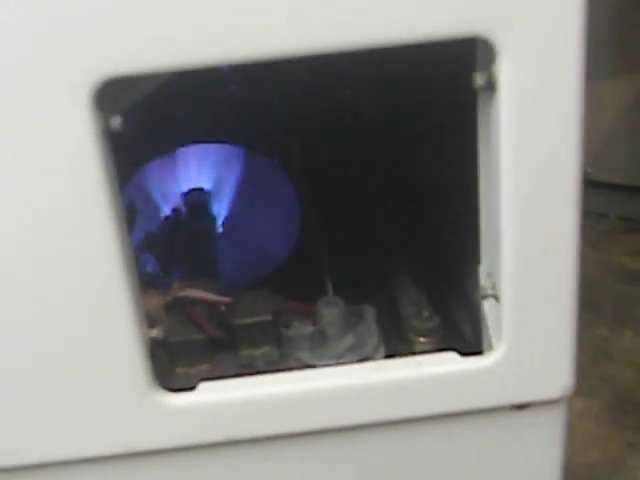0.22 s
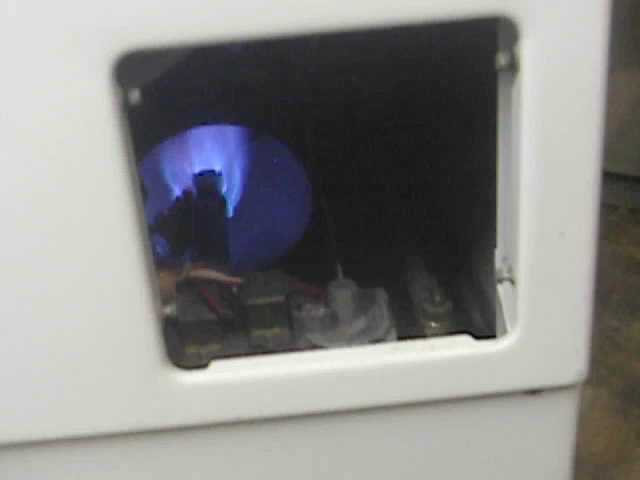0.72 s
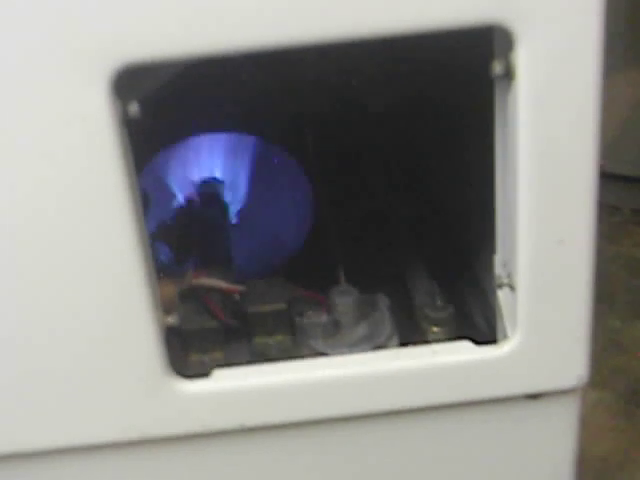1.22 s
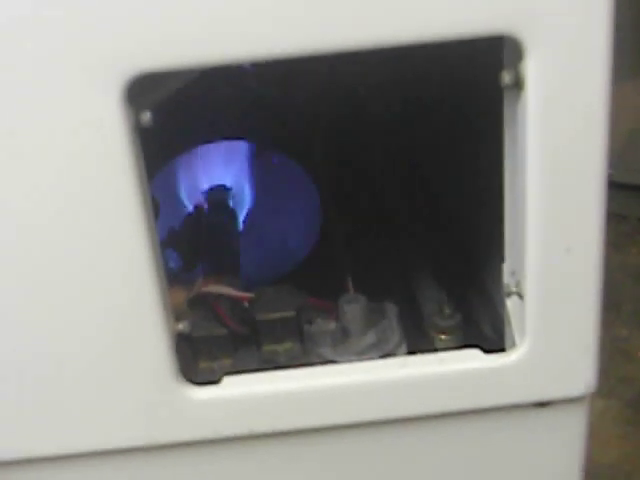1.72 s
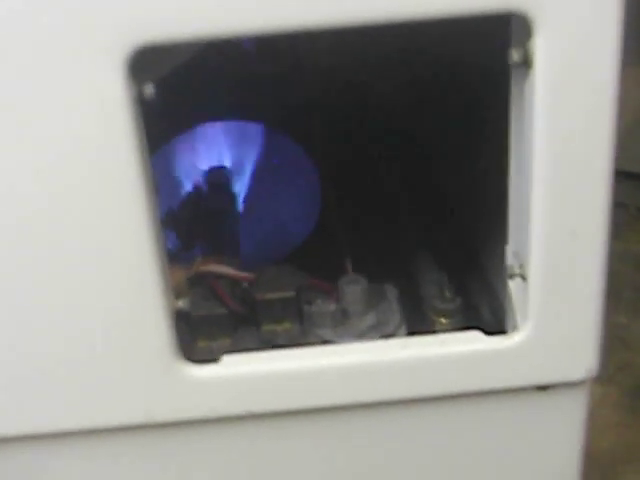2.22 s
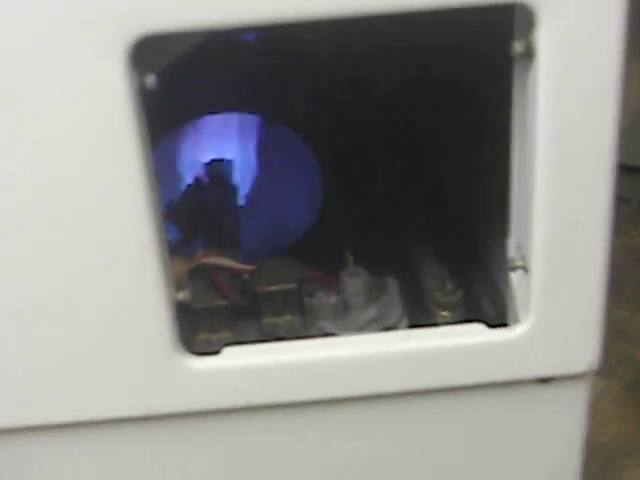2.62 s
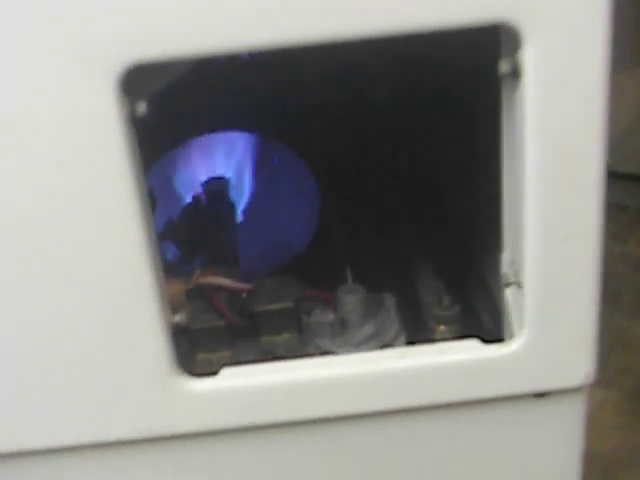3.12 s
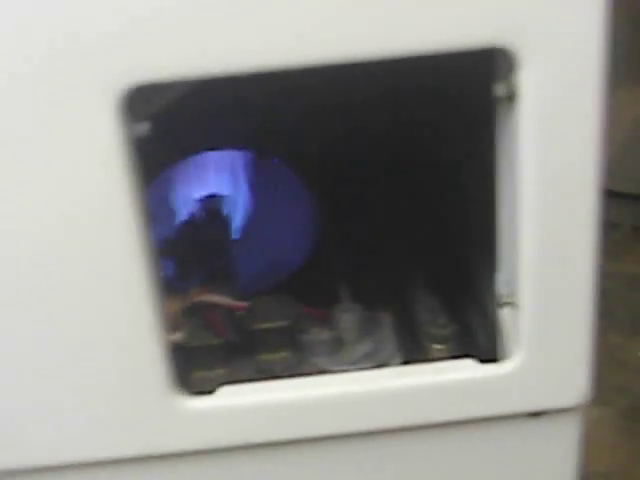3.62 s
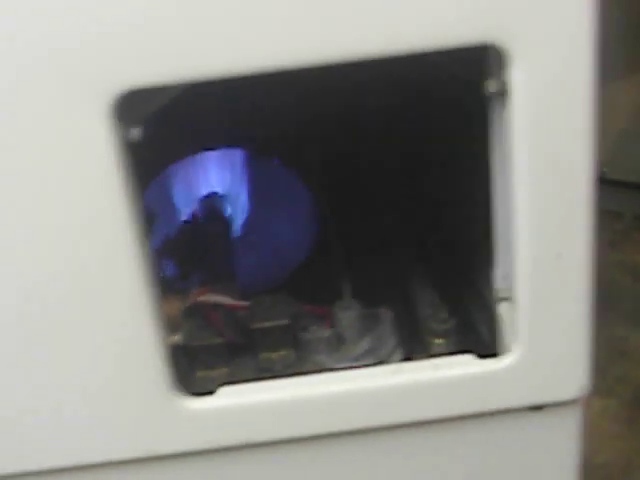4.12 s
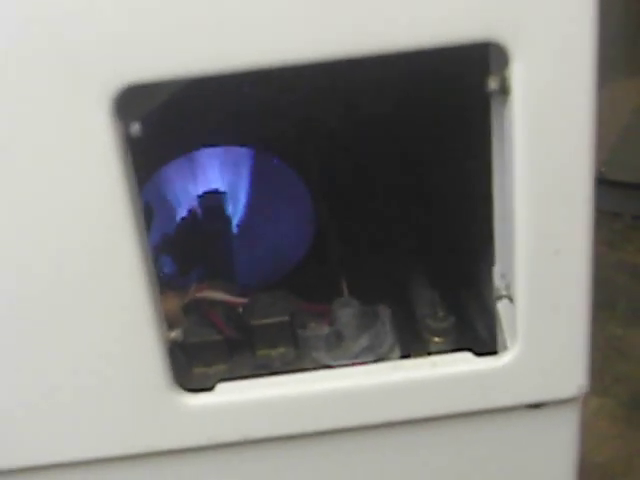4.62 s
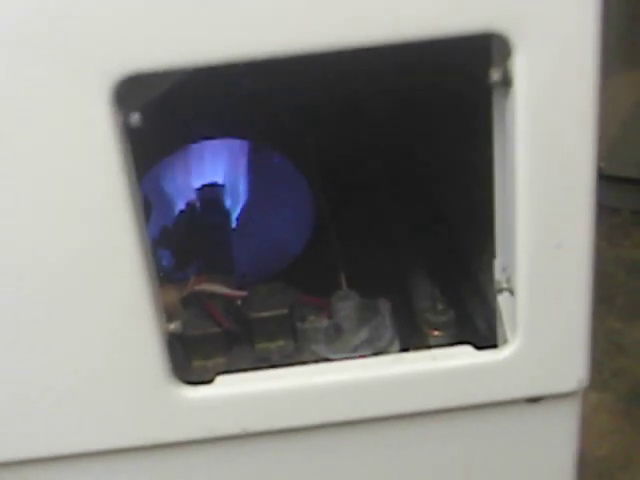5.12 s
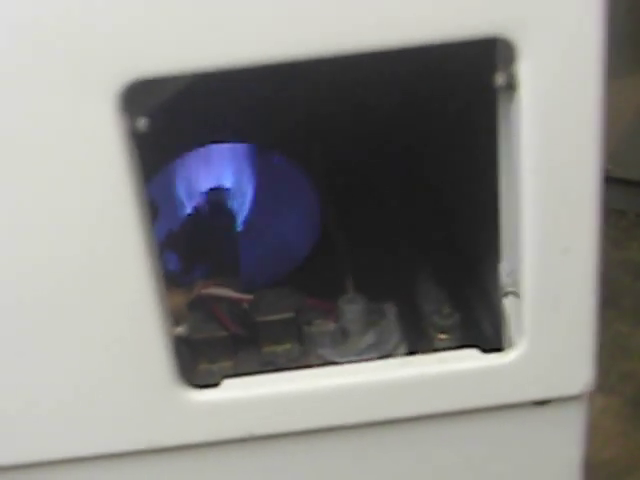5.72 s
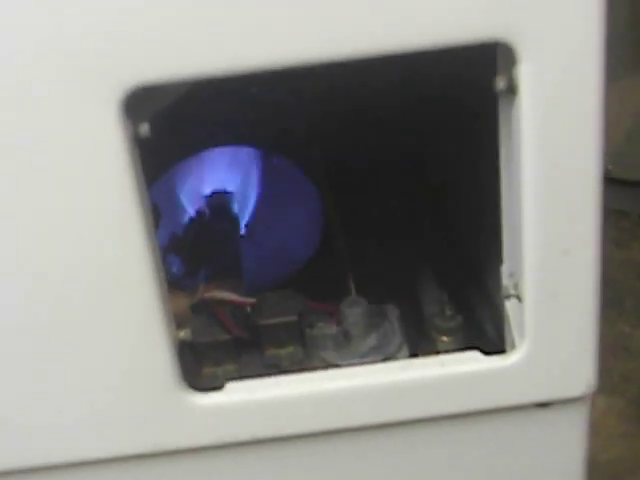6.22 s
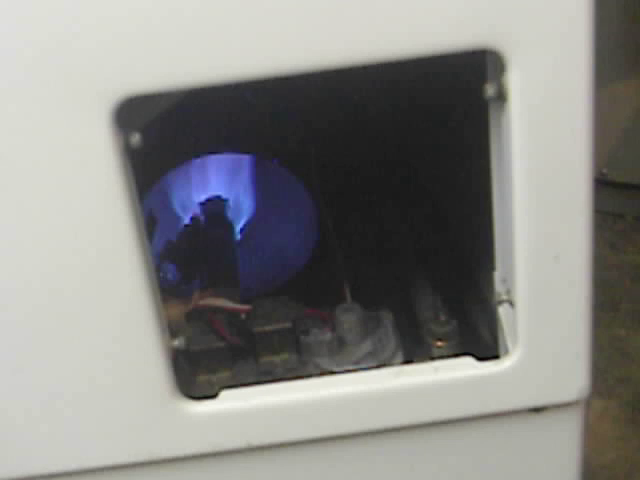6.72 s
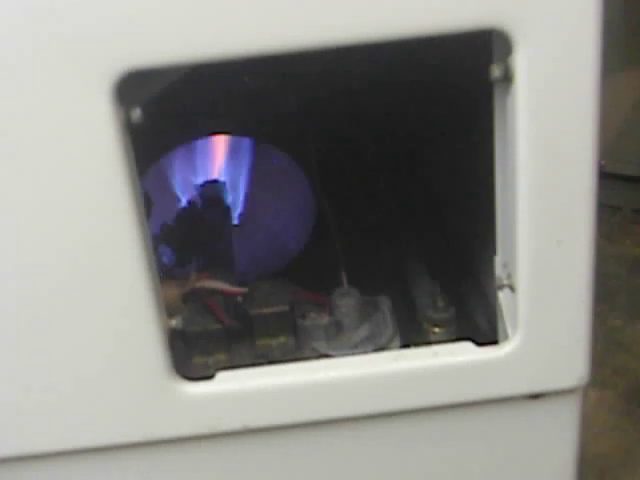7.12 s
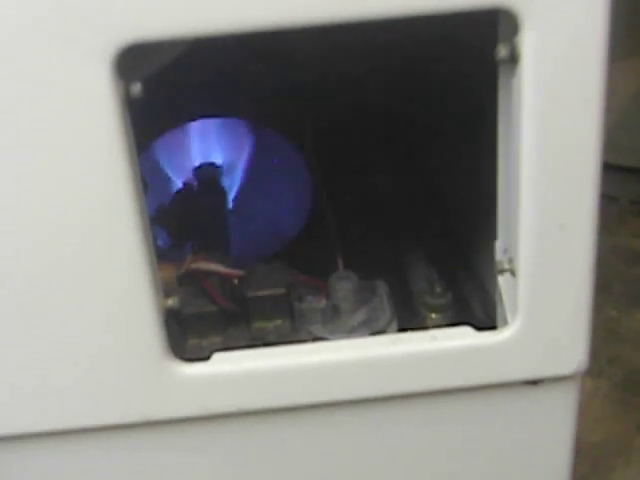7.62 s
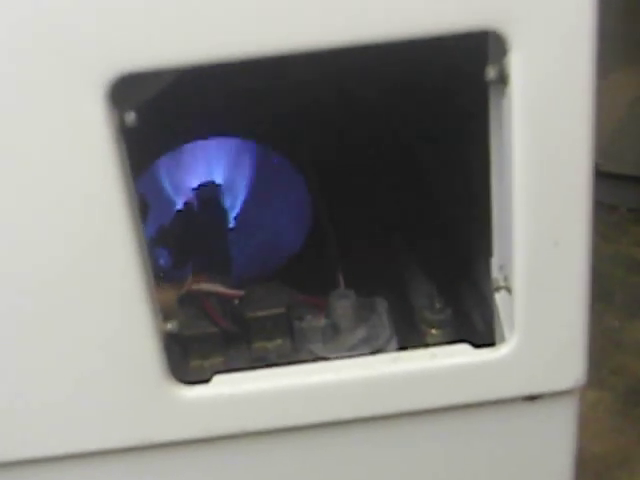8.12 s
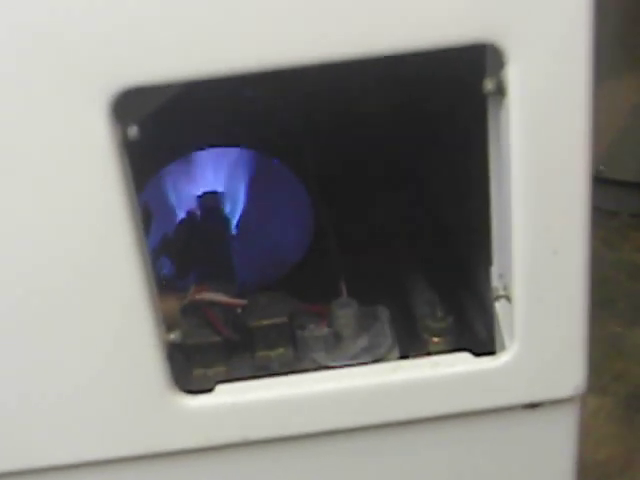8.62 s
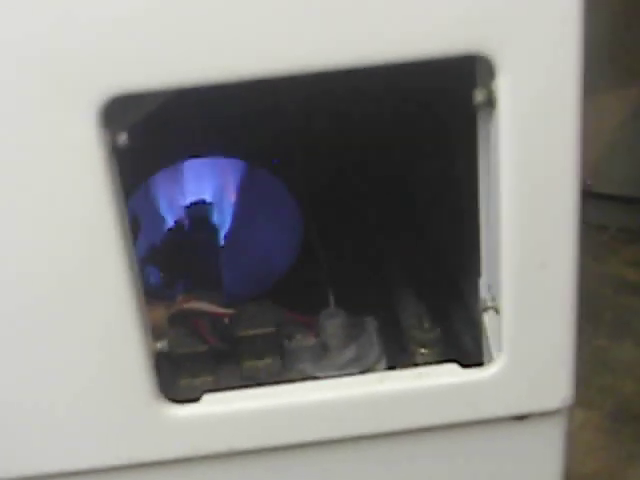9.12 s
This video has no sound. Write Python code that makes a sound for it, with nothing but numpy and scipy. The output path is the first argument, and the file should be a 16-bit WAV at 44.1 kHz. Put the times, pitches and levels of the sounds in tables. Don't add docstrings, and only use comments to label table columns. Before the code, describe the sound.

Boxy burner roar and low motor hum from a running dryer, dull narrow-band sound, small metallic clicks tapping inside the turning drum.

```python
import sys
import numpy as np
from scipy import signal
from scipy.fft import rfft, irfft, next_fast_len
from scipy.io import wavfile
from scipy.ndimage import uniform_filter1d

SR = 44100
rng = np.random.default_rng(int(sys.argv[2]) if len(sys.argv) > 2 else 0)


def natural_amplitude(level_db):
    exponent = np.asarray(level_db, float) / 20
    return 10 ** exponent


def to_wav(sig):
    pcm = np.clip(np.atleast_2d(sig), -1, 1) * 32767
    pcm = np.round(pcm).astype(np.int16)
    wavfile.write(sys.argv[1], SR, pcm.T)


N = 411894
HUM_HZ, SHAFT_HZ, DRUM_HZ, WHINE_HZ = 120.02, 29.42, .85, 615.385
LEFT_HZ, RIGHT_HZ = 7.076, 7.1

# (frequency [Hz], density [dB per Hz])
ROAR_SPECTRUM = [(20, -48.5), (45, -30.5), (70, -19.5), (105, -9), (150, -18), (215, -11), (320, -18.5),
                 (410, -24), (600, -22.5), (760, -26.5), (1500, -29.5), (2400, -29.5), (3300, -28.5),
                 (4200, -34)]
# (frequency [Hz], width [Hz], gain [dB])
CABINET_MODES = [(163, 15, -6.5), (180.7, 13, 9.5), (199, 4.2, -7.5), (252, 16, -1.5), (301.7, 31, 4),
                 (420, 9.1, -4.5), (429.4, 13, 6), (576, 59, 8), (656, 24, 4.5), (822, 14, -0.5),
                 (840.6, 39, 4.5), (940, 100, 2.5), (1010, 50, 0), (1122, 29, 4), (1198, 60, 6),
                 (1294, 8.5, 11), (1307, 30, -4), (1383, 89, 3.5), (1550, 51, -5), (1980, 31, -2.5),
                 (2733, 310, -4), (3360, 37, 5)]
# (time [s], level [dB])
DRAUGHT_LEVEL = [(0, -1), (1, 0.4), (2.4, 0.3), (3, .5), (4, 0), (5, 0.75), (6.3, 0), (8, 1.5), (9.34, .3)]
DRAUGHT_SHARES = [1.3, .3, 0.77]
HUM_LEVELS = [-22, -27, -44]
# (hum multiple [count], shaft multiple [count]), then (rms level [dB])
SWING_MULTIPLES = [(1, -1), (1, 1), (2, -1), (2, 2)]
SWING_LEVELS = [-45, -31, -28, -39]
# (shaft multiple [ratio]), then (rms level [dB])
SHAFT_MULTIPLES = [1, 2, 3, 20, 23.95, 39.906, 47.9, 79.81]
SHAFT_LEVELS = [-51, -51, -53, -47.5, -52.5, -56, -64.5, -52.5]
WHINE_LEVELS = [-60, -52, -47, -58, -57, -50]
# (multiple of the turn [count]), then (rms level [dB])
LEFT_MULTIPLES = [6, 7, 9, 12, 13, 14, 15, 16, 18, 19, 20, 21, 22, 23, 25, 38, 40, 42, 48, 52, 53, 54, 71,
                  72]
LEFT_LEVELS = [-49.5, -57.5, -54.5, -47, -44, -40, -32, -31, -52, -47, -32.5, -36.5, -31.5, -39.5, -39, -48,
               -41.5, -43.5, -51, -58, -52.5, -50.5, -49.5, -44.5]
RIGHT_MULTIPLES = [8, 10, 11, 27, 30, 31, 32, 35]
RIGHT_LEVELS = [-60, -49.5, -41, -42, -32, -38, -45, -47.5]
# (time [s], peak [dB], centre [Hz], ring t60 [s])
BUTTON_KNOCKS = [(.349, -16, 3286, .035), (1.339, -26.5, 3360, 0.093), (1.823, -15.5, 2200, 0.042),
                 (2.897, -12, 2400, .12), (2.975, -12, 1900, 0.047), (3.087, -22.5, 3290, 0.044),
                 (3.227, -18, 2990, 0.039), (3.777, -22, 2400, 0.04), (4.376, -21.5, 3550, 0.05),
                 (4.879, -15, 2630, .04), (4.942, -18.5, 3280, .04), (5.539, -19.5, 1743, 0.14),
                 (6.842, -14, 3510, 0.05), (7.15, -17, 3350, 0.1), (7.228, -14.5, 3280, 0.13),
                 (7.683, -24, 3305, 0.034), (7.74, -17.5, 3280, .055), (8.021, -19.5, 3230, .2),
                 (8.299, -18, 3310, 0.032), (8.343, -13, 3345, .45), (9.132, -16.5, 3610, .05)]
# (time [s], peak [dB], drag [s], brightest [Hz], spread [octaves])
ZIP_CLATTERS = [(1.8224, -13, 0.023, 2800, 0.81), (2.904, -7.5, .018, 2600, 1.1),
                (2.931, -13.5, .016, 2200, 0.8), (2.954, -11, .024, 1500, 1.1),
                (6.747, -13.5, .005, 3000, .35), (7.366, -14, 0.025, 1700, 1.3),
                (8.3185, -2.5, .008, 2900, .45)]
# (frequency [Hz], width [Hz], gain [dB], t60 [s])
WALL_MODES = [(820, 300, -0.5, .08), (1180, 310, -2, .09), (1700, 180, -0.5, 0.081),
              (2200, 340, -0.5, 0.097), (2600, 280, -5, .06), (2910, 260, -2, .06), (3600, 290, -1.5, .08),
              (3960, 290, -3.5, .06)]
# (time [s], peak [dB], frequency [Hz], t60 [s], rise [s])
PANEL_PINGS = [(1.809, -18, 1190, .08, .003), (1.8235, -16, 3480, .07, .0015),
               (1.829, -17, 2950, .04, .002), (1.8365, -17, 2340, .06, .003), (1.837, -19, 3400, .09, .002),
               (2.914, -15, 3950, .03, .002), (2.9225, -13, 1250, .035, .002),
               (2.9225, -14, 1900, .03, .002), (2.931, -15, 2200, .05, .002),
               (2.9555, -15, 1230, .12, .002), (6.7478, -7, 3450, .018, .0008),
               (7.396, -18, 1180, .08, .003), (8.3262, -2, 3390, .022, .0025),
               (8.3365, -10, 3450, .03, .002)]
# (frequency [Hz], gain [dB])
BAND_EDGE = [(3980, 0), (4150, -8), (4300, -19), (4500, -36.5), (4580, -43.5), (4640, -71), (5000, -110)]
# (time [s], cut depth [dB])
RUMBLE_CRESTS = [(2.166, -49), (2.9205, -53), (2.179, -37), (2.9362, -47), (2.942, -42), (7.070, -41),
                 (7.0753, -51.5), (7.948, -54.5), (8.322, -55)]
KNOCK_CRESTS = [(2.9106, -24), (2.9359, -39), (4.3539, -40.5), (5.0398, -62), (5.481, -52), (5.9224, -46),
                (7.522, -38.5), (7.764, -55.5), (8.294, -31), (8.3285, -17.5), (8.3294, -32), (9.147, -61),
                (9.3385, -34)]


def walk(rate):
    hold = int(SR / rate)
    steps = np.repeat(rng.standard_normal(N // hold + 1), hold)
    return 1.15 * uniform_filter1d(uniform_filter1d(steps, hold), hold)[:N]


def tones(phase, multiples, levels_db, locked=False):
    start = rng.random(len(multiples)) * (not locked)
    out = 0
    for k, db, p in zip(multiples, levels_db, start):
        out = out + np.sqrt(2) * natural_amplitude(db) * np.cos(2 * np.pi * (k * phase + p))
    return out


def bandpass(x, low, high):
    return signal.sosfilt(signal.butter(2, [low, high], "band", fs=SR, output="sos"), x)


def burst(hz, width, t60, rise):
    t = np.arange(int(.4 * SR)) / SR
    low, high = np.clip([hz - width / 2, hz + width / 2], 50, SR / 3)
    strikes = natural_amplitude(2.5 * np.repeat(rng.standard_normal(len(t) // 90), 90))
    ring = bandpass(strikes * rng.standard_normal(len(t)), low, high)
    ring = ring * np.minimum(t / rise, 1) * natural_amplitude(-60 * t / t60)
    return ring / np.abs(ring).max()


def add(out, s, sound):
    i = int(s * SR)
    out[i:i + len(sound)] += sound[:N - i]


def whine(t):
    return tones(WHINE_HZ * t, np.arange(1, 7), WHINE_LEVELS)


def seam():
    out = np.zeros(N)
    for s in np.arange(.27, N / SR, 1 / DRUM_HZ):
        add(out, s, natural_amplitude(-19) * burst(1190, 180, .4, 0.1))
    return out


def buttons():
    out = np.zeros(N)
    for s, db, hz, t60 in BUTTON_KNOCKS:
        add(out, s, natural_amplitude(db) * burst(hz, width=230 + 0.23 * hz, t60=t60, rise=.0022))
    return out


def clatter(drag, bright_hz, spread):
    t = np.arange(int(.3 * SR)) / SR
    tooth = t * 160
    uneven_db = 3 * rng.standard_normal(200)[tooth.astype(int)]
    fade_db = 3.5 * (tooth % 1)
    teeth = natural_amplitude(uneven_db - fade_db) * rng.standard_normal(len(t))
    out, held = 0, int(drag * SR)
    for hz, width, db, t60 in WALL_MODES:
        ring = bandpass(teeth, hz - width / 2, hz + width / 2)
        off_db = -6 * (np.log2(hz / bright_hz) / spread) ** 2
        decay_db = -60 * np.maximum(t - drag, 0) / t60
        out = out + ring / ring[:held].std() * natural_amplitude(db + off_db + decay_db)
    out = out * np.minimum(t / .0012, 1)
    return natural_amplitude(-8) * out / out[:held].std()


def zips():
    out = np.zeros(N)
    for s, db, drag, bright_hz, spread in ZIP_CLATTERS:
        add(out, s, natural_amplitude(db) * clatter(drag, bright_hz, spread))
    return out


def pings():
    out = np.zeros(N)
    t = np.arange(SR // 10) / SR
    for s, db, hz, t60, rise in PANEL_PINGS:
        decay = natural_amplitude(db - 60 * np.maximum(t - rise, 0) / t60)
        add(out, s, decay * np.minimum(t / rise, 1) * np.sin(2 * np.pi * hz * t))
    return out


def rollers(t):
    turn = 2 * np.pi * DRUM_HZ * t
    load_db = 1.4 * np.cos(turn + .6) + 0.51 * np.cos(2 * turn + 0.5) + 0.81 * walk(2.8)
    slip = .0012 * np.sin(turn + 1.1) + .0006 * walk(2)
    left = tones(LEFT_HZ * (t + slip), LEFT_MULTIPLES, LEFT_LEVELS)
    right = tones(RIGHT_HZ * (t - slip), RIGHT_MULTIPLES, RIGHT_LEVELS)
    return natural_amplitude(load_db) * (left + right)


def motor(t):
    hum = tones(HUM_HZ * t, np.arange(1, 4), HUM_LEVELS, locked=True) * natural_amplitude(.5 * walk(2.8))
    sideband_hz = [h * HUM_HZ + s * SHAFT_HZ for h, s in SWING_MULTIPLES]
    swing = tones(t, sideband_hz, SWING_LEVELS, locked=True)
    return hum + swing + tones(SHAFT_HZ * t, SHAFT_MULTIPLES, SHAFT_LEVELS)


def roar(t):
    size = next_fast_len(N)
    hz = np.arange(1, size // 2 + 2) * SR / size
    corner_hz, corner_db = np.transpose(ROAR_SPECTRUM)
    db = np.interp(np.log(hz), np.log(corner_hz), corner_db)
    for mode_hz, width, gain in CABINET_MODES:
        db = db + gain / (1 + (2 * (hz - mode_hz) / width) ** 2)
    air = rfft(rng.standard_normal(size)) * natural_amplitude(db)
    pull = np.interp(t, *np.transpose(DRAUGHT_LEVEL))
    bass, middle, treble = (share * (pull - pull.mean()) for share in DRAUGHT_SHARES)
    out, lick = 0, walk(11)
    for centre in 20 * 2 ** (np.arange(25) / 3):
        band = np.maximum(1 - np.abs(3 * np.log2(hz / centre)), 0)
        draught = bass if centre < 400 else middle if centre < 1200 else treble
        flicker_db = .6 * walk(12) + 0.92 * lick * min(centre / 2500, 1)
        out = out + irfft(air * band, size)[:N] * natural_amplitude(draught + flicker_db)
    return out / out.std() * natural_amplitude(-17)


def scene():
    t = np.arange(N) / SR
    knocks = buttons() + zips() + pings()
    return (whine(t) + seam() + knocks + rollers(t) + motor(t) + roar(t))[None]


def shave(x, crests, half):
    cap = half * np.maximum(1 - (np.arange(-12, 13) / half) ** 2, 0)
    for s, db in crests:
        add(x, s, -natural_amplitude(db) * cap)


def roll_off(x):
    return signal.sosfilt(signal.butter(12, 15800, fs=SR, output="sos"), x)


def record(dry):
    x = np.clip(dry[0], -.56, .61) * np.minimum(np.arange(N) / 40, 1)
    size = 441 * next_fast_len(N // 441 + 20)
    spectrum = rfft(x, size)
    fold = size * 8000 // 2 // SR
    spectrum[fold + 1:2 * fold + 1] = np.conj(spectrum[fold - 1::-1])
    hz = np.arange(size // 2 + 1) * SR / size
    edge = natural_amplitude(np.interp(hz, *np.transpose(BAND_EDGE)))
    x = irfft(spectrum * edge, size)[:N] - .0336
    shave(x, RUMBLE_CRESTS, 4.6)
    shave(x, KNOCK_CRESTS, 2.1)
    return roll_off(np.clip(x, -.707, .707)[None])


dry = scene()
out = record(dry)
to_wav(out)
```